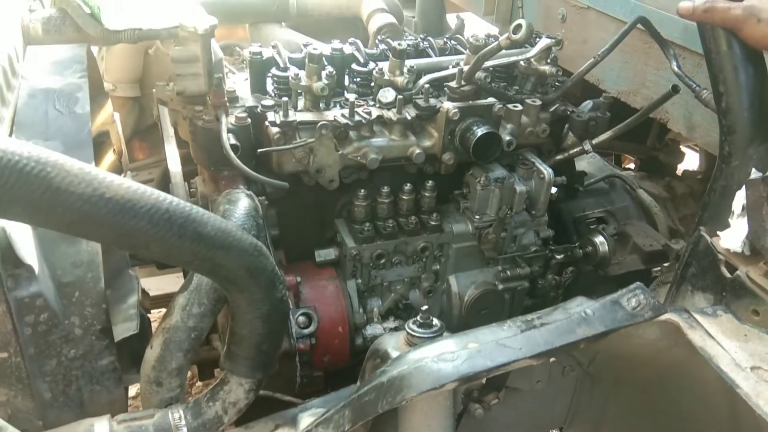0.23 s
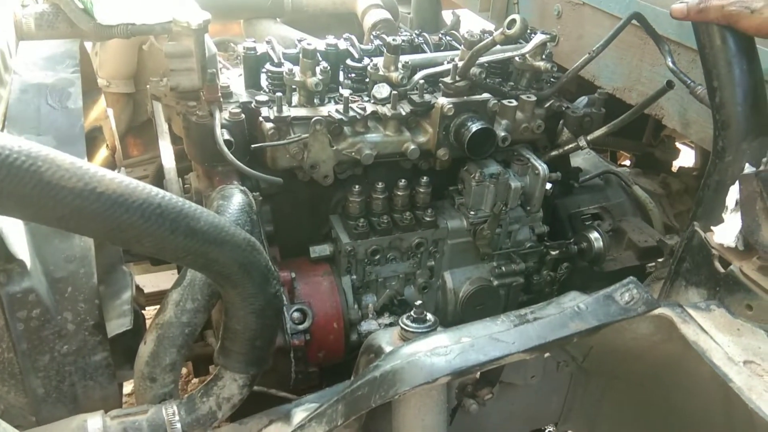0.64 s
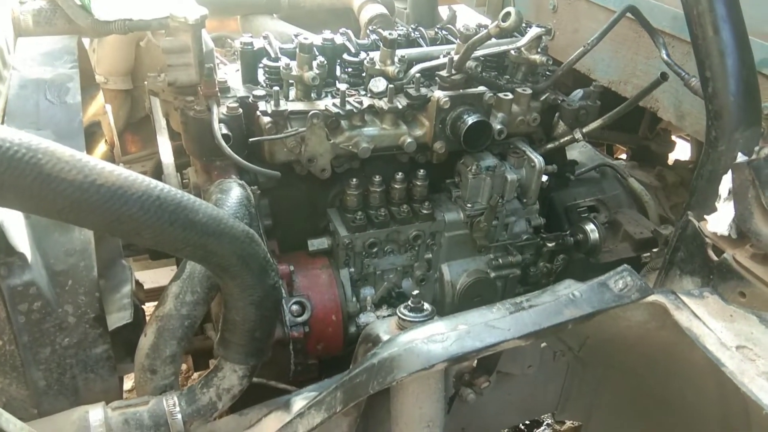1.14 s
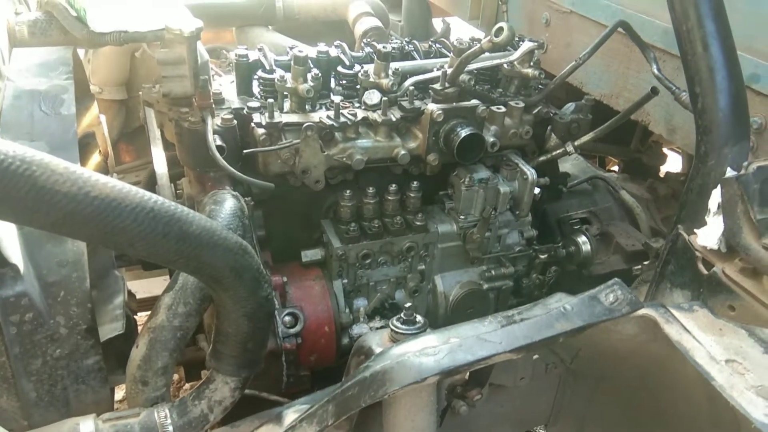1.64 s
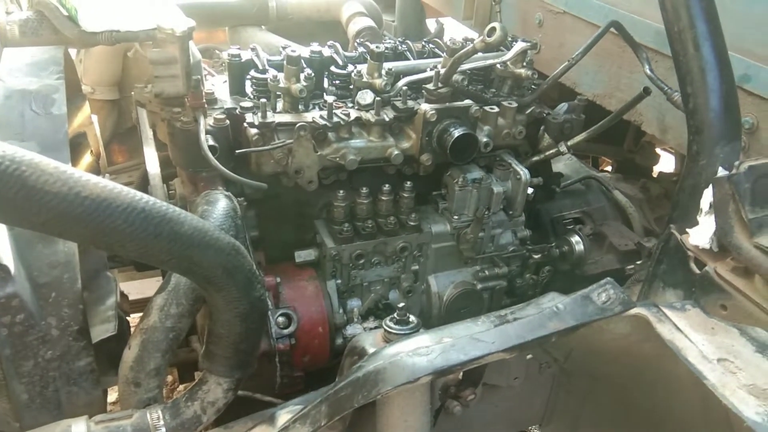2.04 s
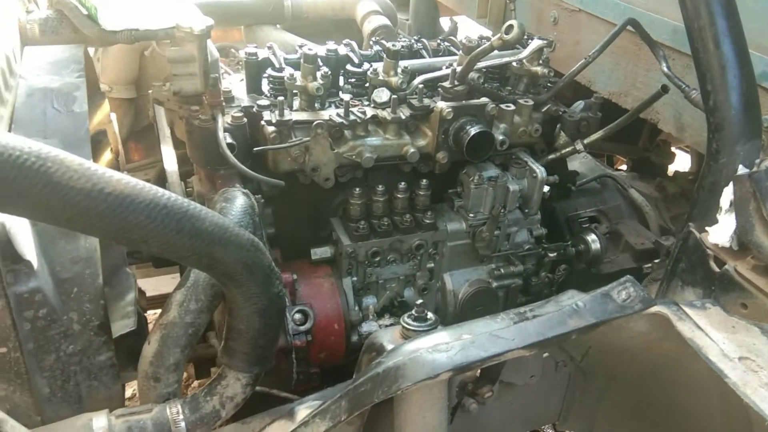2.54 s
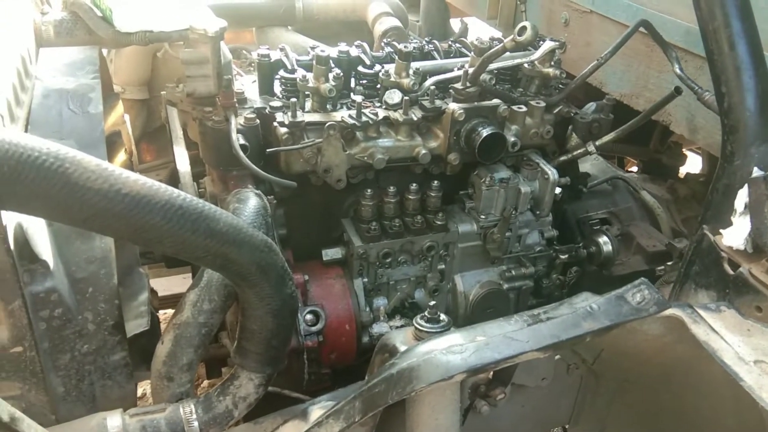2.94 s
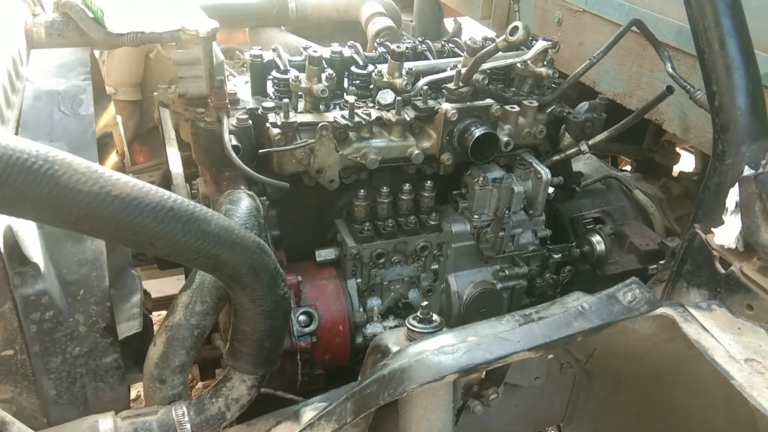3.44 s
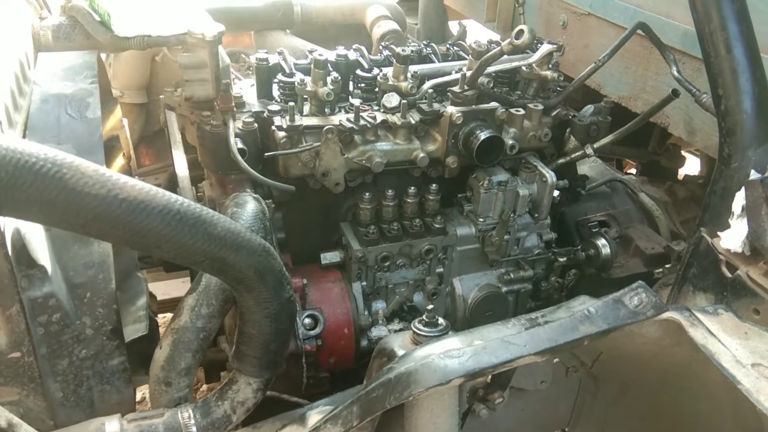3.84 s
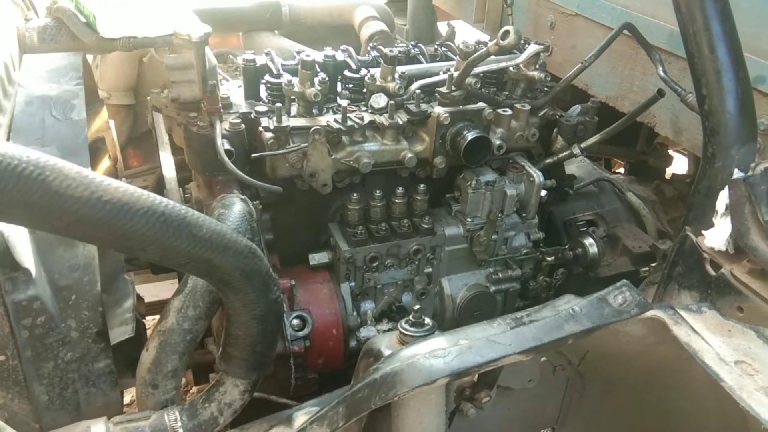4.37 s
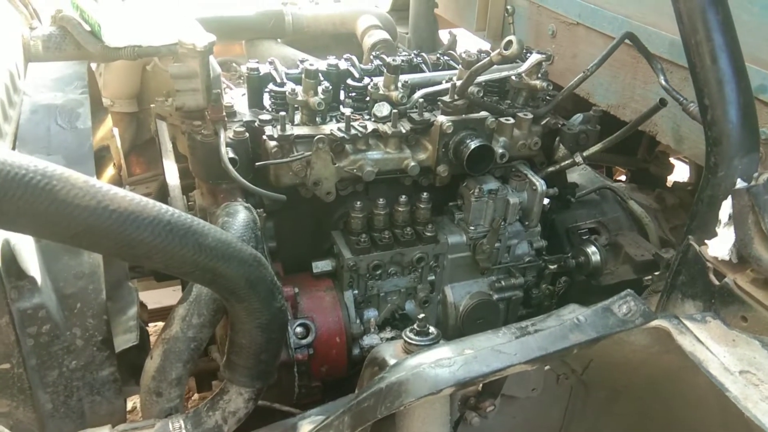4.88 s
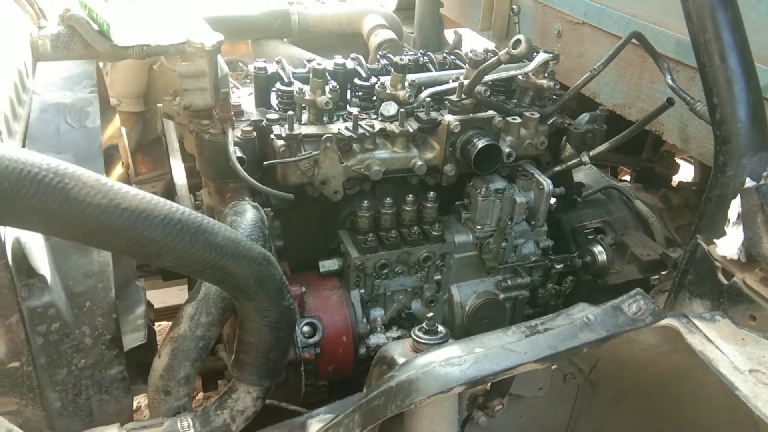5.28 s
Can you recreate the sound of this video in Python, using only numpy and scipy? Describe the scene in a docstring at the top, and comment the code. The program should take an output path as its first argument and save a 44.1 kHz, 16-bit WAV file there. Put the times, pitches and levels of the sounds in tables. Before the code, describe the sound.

Beside an exposed engine in a farmyard, quiet spanner-like ticks and a rustle sit close over distant traffic, hiss and cicadas. A dove coos softly, chicks peep faintly. Suddenly a tool hits metal, bouncing and ringing for under half a second, and the automatic gain ducks everything before recovering. Afterwards several distant roosters overlap, one note stretches on thinly, a boxy knock follows, and a heavier hollow thud closes the mono take.

```python
"""An open truck workshop in a farmyard, heard through one microphone with automatic gain.
Hiss, traffic rumble, engine notes and insects (shaped noise and tones) run from the start.
Ticks (noise puffs), a dove (fluttering tone), a rustle, chicks (whistles) and tinkles follow.
At 2.4 s a dropped spanner clangs on steel (ringing modes), rattles and lies down; the gain ducks and recovers.
From 3.3 s far roosters (overtone stacks) crow, one holding a long note; hollow thuds come at 3.6 and 5.4 s."""
import sys
import numpy as np
from scipy import signal
from scipy.fft import rfft, irfft, next_fast_len
from scipy.io import wavfile
from scipy.ndimage import uniform_filter1d, minimum_filter1d, map_coordinates

SR = 44100
rng = np.random.default_rng(int(sys.argv[2]) if len(sys.argv) > 2 else 0)


def log_audio(samples):
    """Write samples as a 16-bit WAV file to the path given in sys.argv[1]."""
    # one column per channel
    frames = np.atleast_2d(samples).T
    # limit to full scale, then quantise
    limited = np.clip(frames, -1, 1)
    pcm = np.round(limited * 32767).astype(np.int16)
    wavfile.write(sys.argv[1], SR, pcm)


N = 242982
T = np.arange(N) / SR


def amp(db):
    """Decibel law: the amplitude gain of a level."""
    return 10 ** (np.asarray(db) / 20)


def unit(x):
    """Power normalisation: x at rms 1."""
    return x / np.sqrt(np.mean(np.abs(x) ** 2) + 1e-20)


def filtered(x, response):
    """Linear filtering: the spectrum of x times a response of frequency."""
    m = next_fast_len(len(x) + 8192)
    spectrum = rfft(x, m) * response(np.fft.rfftfreq(m, 1 / SR))
    return irfft(spectrum, m)[:len(x)]


def modes(table):
    """Modal superposition: the response of (hz, width_hz, level_db) resonances with alternating signs."""
    def response(f):
        total = 0
        for k, (hz, width_hz, level_db) in enumerate(table):
            damping = 1j * f * width_hz
            total = total + (-1) ** k * amp(level_db) * damping / (hz * hz - f * f + damping)
        return total
    return response


def noise(points, size=N):
    """Spectral shaping: noise of rms 1 coloured by (hz, level_db) points on a log frequency axis."""
    f, db = np.transpose(points)
    return unit(filtered(rng.standard_normal(size), lambda hz: amp(np.interp(np.log(hz + 1), np.log(f), db))))


def wobble(rate):
    """Random modulation: a smooth curve through rate random knots a second."""
    return map_coordinates(rng.standard_normal(SR // 10), [T * rate], order=2, mode="wrap")


def smeared(phase, share, rate):
    """Line broadening: a tone of rms 1, a share of whose power is spread into narrow noise."""
    smear = unit(wobble(rate) + 1j * wobble(rate))
    return np.sqrt(2) * np.imag((np.sqrt(1 - share) + np.sqrt(share) * smear) * np.exp(1j * phase))


def add(track, s, x):
    """Superposition: mixes x into track from second s."""
    part = track[round(s * SR):][:len(x)]
    part += x[:len(part)]


def far(x, t60, wet_db):
    """Reverberation: the direct sound plus an exponentially decaying noise tail of echoes."""
    t = T[:SR // 2]
    tail = rng.standard_normal(len(t)) * amp(-60 * t / t60)
    return x + amp(wet_db) * signal.fftconvolve(x, tail / np.linalg.norm(tail))[:N]


def call(notes, attack, release, dip_db, sag_db, scoop_hz=0):
    """Voice contour: phase, gain and last column; notes rise out of a dip, glide, sag per second, fall back."""
    rows = []
    for s, length, first_hz, last_hz, db, control in notes:
        glide_hz, end_db = (last_hz - first_hz) / length, db - sag_db * length
        rows += [(s, first_hz - scoop_hz, db - dip_db, control),
                 (s + attack, first_hz + glide_hz * attack, db, control),
                 (s + length - release, last_hz - glide_hz * release, end_db, control),
                 (s + length, last_hz, end_db - dip_db, control)]
    s, hz, db, control = np.transpose(rows)
    phase = 2 * np.pi * np.cumsum(np.interp(T, s, hz)) / SR
    gain = amp(np.interp(T, s, db, left=-200, right=-200))
    return phase, gain, np.clip(np.interp(T, s, control), 0, 1)


# Spectrum of the far hiss: pitch_hz [Hz], level_db [relative dB per Hz]
HISS_SPECTRUM = [(100, -16.5), (220, 5), (400, 1), (800, -5), (1500, -9), (3000, -12.5), (4500, -13),
                 (5700, -17), (9500, -22), (12200, -28), (15500, -29)]
# Spectrum of the traffic: pitch_hz [Hz], level_db [relative dB per Hz]
RUMBLE_SPECTRUM = [(20, -26), (40, -18), (65, -3), (85, 0.5), (130, -1.5), (175, -5.5), (230, -19.5),
                   (400, -50)]
# Course of the traffic: time_s [s], level_db [dB, before a small random drift]
TRAFFIC_COURSE = [(0, -62), (.8, -58), (1.5, -58), (2.3, -58), (3, -55), (3.7, -58.5), (4.3, -53),
                  (4.9, -56.5), (5.5, -52.5)]


def yard():
    """Broadband noise: a nearly steady hiss over a lumpy low traffic rumble."""
    traffic_db = np.interp(T, *np.transpose(TRAFFIC_COURSE)) + 1.3 * wobble(2.8)
    hiss = amp(-66.0 + 0.69 * wobble(8.4)) * noise(HISS_SPECTRUM)
    return hiss + amp(traffic_db) * noise(RUMBLE_SPECTRUM)


# Far engines: start_s [s], length_s [s], first_hz [Hz], last_hz [Hz],
# level_db [dB at the end of the swell], unsteadiness [0-1]
ENGINE_NOTES = [(0, 2.1, 164.2, 182.6, -60.5, 0.62), (3.689, 1.49, 132, 145, -55, 0.44)]


def drones():
    """Gliding quasi-periodic tones: engine notes that swell out of the rumble."""
    out = np.zeros(N)
    for note in ENGINE_NOTES:
        phase, gain, unsteady = call([note], attack=0.89, release=0.23, dip_db=16, sag_db=6)
        out += gain * amp(1.55 * wobble(4.12)) * smeared(phase, unsteady, rate=10)
    return out


# Cicada chorus bands: pitch_hz [Hz], width_hz [Hz], level_db [relative dB of one of two filter passes]
CICADA_BANDS = [(6708, 400, -5), (7887, 500, 0)]


def insects():
    """Resonance and amplitude modulation: a cicada chorus, a katydid's falling clicks, a cricket's chirps."""
    band = modes(CICADA_BANDS)
    chorus = unit(filtered(rng.standard_normal(N), lambda f: band(f) ** 2))
    chorus = chorus * amp(0.79 * wobble(60) + 0.34 * wobble(1.4))

    stroke = (108.8 * T + 0.042 * wobble(3)) % 1  # position within each stroke of the buzz
    sweep = 2 * np.pi * np.cumsum(11350 - 1400 * stroke + 100 * wobble(450)) / SR
    katydid = np.exp(-((stroke - .3) / 0.19) ** 2) * amp(2.5 * wobble(90)) * np.sin(sweep)
    others = modes([(10750, 900, 0)])  # more katydids far off blur into a hiss
    katydid = katydid + amp(-8.5) * unit(filtered(rng.standard_normal(N), lambda f: others(f) ** 2))

    chirp = np.exp(-(((14.03 * T - .57) % 1 - .5) / .17) ** 2) * amp(2.5 * wobble(4))
    cricket = chirp * np.sin(2 * np.pi * 8490 * T + 1.5 * wobble(40))
    return amp(-61.5) * chorus + amp(-73.5) * katydid + amp(-71) * cricket


# Noise of ticks and drags: pitch_hz [Hz], level_db [relative dB per Hz]
SCUFF_SPECTRUM = [(100, -0.5), (300, 7.5), (2000, -2), (5000, -13), (9000, -23), (16000, -51.5)]
# Dull ticks: start_s [s], level_db [nominal dB], pitch_hz [Hz]
DULL_TICKS = [(0.138, -52, 920), (.293, -59.5, 2100), (0.619, -61.5, 1650), (.706, -55.5, 1900),
              (1.352, -56, 300), (1.51, -59, 1130), (1.558, -58, 1600), (1.596, -59.5, 1120),
              (1.66, -58.5, 1050), (1.681, -65, 1010), (2.205, -64.5, 3000), (2.405, -47.5, 880),
              (2.54, -39, 635), (2.661, -47.5, 1400), (2.694, -46.5, 2240), (2.721, -50, 1478),
              (2.758, -51, 1530), (3.03, -62.5, 2490), (3.415, -48.5, 1210), (3.579, -41.5, 1200)]


def ticks():
    """Damped impact: a noise puff in one broad resonance, with a bright crack at first contact."""
    out, t = np.zeros(N), T[:SR // 2]
    body_t60_s, crack_t60_s = 0.12, .012
    for s, db, hz in DULL_TICKS:
        body = modes([(hz, 0.52 * hz, 0)])
        puff = unit(filtered(noise(SCUFF_SPECTRUM, len(t)), lambda f: body(f) ** 2 + 0.082))
        puff = puff * amp(db - 5.5 - 60 * t / body_t60_s) * (1 + 1.4 * np.exp(-t / .004))
        crack = noise([(500, -0.5), (5000, -3.5), (16000, -20.5)], len(t))
        add(out, s, puff + amp(db - 5 - 60 * t / crack_t60_s) * crack)
    return out


# Coos: start_s [s], length_s [s], top_hz [Hz], last_hz [Hz],
# level_db [dB at the end of the swell], flutter [0-1]
COOS = [(0.482, 0.084, 489, 475, -53.5, 0.5), (1.157, 0.24, 518.4, 476, -59.5, 0.13),
        (1.464, .62, 522, 503, -57, 0.86), (2.069, 0.67, 490.5, 432, -55.5, 0.03)]


def dove():
    """Amplitude modulation: a near-pure tone fluttered near 48 Hz, alternate beats stronger; rolls swell slowly."""
    beat = np.pi * np.cumsum(48 + 6 * wobble(11)) / SR
    flutter = (.15 + np.sin(beat) ** 4) * (1 + 0.15 * np.sin(beat))
    flutter = unit(flutter * amp(2.5 * wobble(40)))
    out = np.zeros(N)
    for coo in COOS:
        length, roll = coo[1], coo[5]
        # a coo slides up while it swells, a rolled one further
        phase, gain, share = call([coo], attack=0.03 + 0.64 * length * roll, release=0.041, dip_db=13,
                                  sag_db=12, scoop_hz=18 + 79.8 * roll)
        out += gain * (1 - share + share * flutter) * smeared(phase, 0.2 * share, rate=140)
    return far(out, t60=0.21, wet_db=-8.0)


# Resonances of a hollow box: pitch_hz [Hz], width_hz [Hz], level_db [relative dB]
BOX_MODES = [(388, 50, 0.5), (453, 127, -5.5), (670, 340, -10.5), (868, 140, -2), (1120, 310, -11),
             (1646, 43, -2.5), (4080, 380, -24)]
# Thuds and one rustle (the first row, its box far below its crunch):
# start_s [s], box_db [dB gain], crunch_db [dB gain], drag_s [s], t60_s [s]
DRAGS = [(0.576, -77, -65.5, 0.081, 0.32), (3.57, -54.5, -59, 0.089, 0.28),
         (3.677, -34.5, -54, 0.021, 0.15), (5.324, -48.5, -62.5, 0.0704, 0.12),
         (5.39, -23.5, -44, 0.029, 0.19)]


def rustle_and_thuds():
    """Forced resonance: a crunchy drag, hardest at first contact, rustles or drives a hollow box into a thud."""
    out, t = np.zeros(N), T[:SR // 2]
    for s, box_db, crunch_db, length, t60 in DRAGS:
        drag = amp(-60 * np.maximum(t - length, 0) / t60) * noise(SCUFF_SPECTRUM, len(t))
        drag *= (1 + 2.2 * np.exp(-t / 0.006)) * (1 - np.exp(-t / .0015))
        add(out, s, amp(box_db) * filtered(drag, modes(BOX_MODES)) + amp(crunch_db) * drag)
    return out


# Chicks: start_s [s], length_s [s], middle_hz [Hz], fall_hz [Hz from start to end],
# level_db [dB before huskiness and echo]
CHICK_PEEPS = [(0.584, 0.039, 4380, 203, -57.5), (1.683, 0.08, 4230, 1366, -56.5),
               (2.419, 0.044, 4420, -170, -51), (3.249, 0.056, 4140, 2001.5, -56),
               (4.211, 0.043, 4380, -360, -58.5), (4.703, 0.022, 7280, 2895, -44.5),
               (4.937, 0.022, 4550, 0.5, -66), (4.99, 0.047, 4340, -320, -57),
               (5.045, 0.032, 4600, 97, -60.5), (5.124, 0.054, 4350, 437, -71)]


def chicks():
    """Frequency modulation: quick arched whistles, husky by random gain and heard mostly as echoes."""
    out = np.zeros(N)
    arch_hz = 690  # the middle stands this far above the line from start to end
    for s, length, middle_hz, fall_hz, db in CHICK_PEEPS:
        u = T[:round(length * SR)] / length
        hz = middle_hz - fall_hz * (u - .5) - arch_hz * (2 * u - 1) ** 2
        swell = np.sin(np.pi * u ** 0.53) ** 2
        add(out, s, amp(db) * swell * np.sin(2 * np.pi * np.cumsum(hz) / SR))
    husky = out * (.3 + wobble(1100))
    return far(husky, t60=0.33, wet_db=1.5)


# Small loose parts: start_s [s], pitch_hz [Hz], level_db [dB before the onset and echo], t60_s [s]
LOOSE_PARTS = [(.602, 6400, -50, .05), (.638, 6380, -38, 0.035), (.639, 3490, -47.5, 0.027),
               (.64, 10300, -64, .1), (1.512, 8850, -65, 0.37), (1.52, 3310, -68, 0.32),
               (1.53, 11700, -65, 0.5), (1.556, 5798, -68, 0.64), (1.625, 5820, -65, 0.96),
               (1.81, 9300, -67, 0.16), (4.51, 4960, -73.5, 0.079), (4.55, 4260, -74, .25),
               (5.345, 4520, -62, 0.23)]


def tinkles():
    """Free vibration: each small loose part rings in a single decaying mode."""
    out, t = np.zeros(N), T[:SR // 2]
    for s, hz, db, t60 in LOOSE_PARTS:
        onset = 1 - np.exp(-t / 0.0002)
        add(out, s, amp(db - 60 * t / t60) * np.sin(2 * np.pi * hz * t) * onset)
    return out


def ring(table, s, t, spent, hardness_db, rocking_db):
    """Modal decay: modes keep phase from blow to blow, decay over spent seconds, brighten with hardness."""
    out = 0
    for hz, db, t60 in table:
        start_db = db + hardness_db * np.log2(hz / 8000) + rng.normal(0, 4)
        # a turning tool beams each mode past the listener
        rock_db = rocking_db * np.sin(2 * np.pi * (rng.uniform(4, 10) * t + rng.random()))
        out = out + amp(start_db + rock_db - 60 * spent / t60) * np.sin(2 * np.pi * hz * (s + t))
    return out


# Modes of the struck plate: pitch_hz [Hz], level_db [relative dB before hardness and scatter], t60_s [s]
PLATE_MODES = [(2327, -21, .07), (2941, -23, .06), (3833, -17, .1), (4447, -24, .06), (5669, -15, .25),
               (7458, -20, .07), (8084, 0, .13), (8697, -13, .22), (12333, -21, .13), (13020, -36, .12),
               (14620, -35, .15), (14980, -36, .2), (15150, -38, .2)]
# Modes of the spanner: pitch_hz [Hz], level_db [relative dB before hardness and scatter], t60_s [s]
SPANNER_MODES = [(1045, -36, .6), (1868, -28, .12), (2255, -25, 2), (2750, -25, 2), (3709, -30, .3),
                 (5351, -3, .6), (5357, -5, .5), (6135, -4, .4), (6150, -9, .8), (9243, -9, .2),
                 (9265, -4, .6), (9286, -8, .25), (10752, -7, .5), (10782, -9, .2), (11410, -15, .4),
                 (11510, -24, .2), (13790, -24, .3)]
# Blows: start_s [s], plate_db [dB gain], spanner_db [dB gain], clatter_db [dB gain], chatter_s [s]
SPANNER_BLOWS = [(2.405, -74.5, -65, -45, 0.0012), (2.4561, -10, -40, -15, 0.027),
                 (2.473, -15.5, -62, -26, 0.022), (2.484, -22.5, -33.5, -22.5, 0.0042),
                 (2.535, -10.5, -24.5, -30, 0.00067), (2.574, -71, -62, -40, 0.0021),
                 (2.599, -68.5, -44, -53, 0.048), (2.691, -46, -48, -70, 0.004),
                 (3.415, -71, -56, -77, 0.0041)]
# Noise of a blow: pitch_hz [Hz], level_db [relative dB per Hz]
CLATTER_SPECTRUM = [(25, -27.5), (50, -8), (90, 7.5), (200, -4.5), (900, -8), (2700, -5), (4500, -9.5),
                    (6500, -14), (8200, -4), (10500, -21), (16000, -19.5)]


def clang():
    """Impact excitation: chatter sustains plate and noise; the spanner rings until it lies down."""
    out, t = np.zeros(N), T[:SR // 2]
    lies_down_s, lying_ring_s = 2.782, 0.088  # once lying, it rings freely only this long
    for s, plate_db, spanner_db, clatter_db, chatter in SPANNER_BLOWS:
        free = max(lies_down_s - s, lying_ring_s)
        hardness_db = 2.5 + 0.071 * (clatter_db + 33.5)  # treble tilt in dB per octave
        spent = np.maximum(t - chatter, 0)
        rise = 1 - np.exp(-t / (.001 + 0.069 * chatter))
        plate = amp(plate_db) * ring(PLATE_MODES, s, t, spent, hardness_db, rocking_db=-0.94)
        spanner = ring(SPANNER_MODES, s, t, t, hardness_db, rocking_db=7.5) * (1 - np.exp(-t / 0.016))
        spanner *= amp(spanner_db - 60 * np.maximum(t - free, 0) / 0.12)
        fade = amp(-250 * np.minimum(t, chatter) - 60 * spent / .02) + amp(-12 - 60 * t / .2)
        clatter = amp(clatter_db) * fade * noise(CLATTER_SPECTRUM, len(t))
        add(out, s, rise * (plate + spanner + clatter))
    return out


# Roosters, each a pair: overtones level_db [relative dB], then syllables: start_s [s], length_s [s],
# first_hz [Hz], last_hz [Hz], level_db [dB before overtone levels], hoarseness [0-1]
ROOSTER_CROWS = [([-8.5, -2, -21.5, -6.5, -20], [(3.36, 0.2, 769.5, 765, -62.5, 0.62),
                 (3.68, 0.24, 777, 781, -65, 0.41), (3.96, .21, 797, 789, -59, 0.56),
                 (4.2, 0.14, 762, 757, -61, 0.28)]), ([1.5, 7, -11, -12.5],
                 [(3.61, 0.15, 935, 940, -66.5, .55), (3.86, 0.134, 941, 952, -68, 0.3),
                 (3.99, 0.18, 929, 945, -69, 0.35)]), ([-1.5, -16, -0.5, -25],
                 [(4.11, 0.11, 728, 719, -58.5, 0.07), (4.25, 0.073, 728, 730, -62.5, 0.2)]),
                 ([-19.5, 0, -3, -5, -11.5, -7], [(3.32, 0.19, 634, 608, -64.5, 0.62),
                 (3.78, 0.23, 575, 561, -63, 0.52), (3.99, 0.27, 598, 580, -66, 0.54)])]


def roosters():
    """Harmonic synthesis: louder is brighter, hoarseness smears overtones and moving air makes each waver."""
    out = np.zeros(N)
    for overtones_db, syllables in ROOSTER_CROWS:
        phase, gain, hoarse = call(syllables, attack=.045, release=0.043, dip_db=5.5, sag_db=9)
        for k, db in enumerate(overtones_db):
            brightness = (gain / amp(-56.5)) ** (0.086 * k)
            waver = amp(db + 3.4 * wobble(16))
            out += gain * brightness * waver * smeared((k + 1) * phase, hoarse, rate=250)
    return far(out, t60=.25, wet_db=-13)


# First rooster's long last note, harmonics counted from the fundamental: time_s [s],
# second_hz [Hz], second_db [dB], fourth_db [dB]
LONG_NOTE = [(4.35, 1517, -67, -60.5), (4.372, 1512, -58.5, -67.5), (4.536, 1515, -54, -64.5),
             (4.674, 1515, -61.5, -76), (4.702, 1512, -61, -88), (4.748, 1517, -57, -71),
             (4.8, 1518, -63.5, -63), (4.86, 1517, -69, -70), (5.02, 1523, -54.5, -67.5),
             (5.064, 1514, -70.5, -73.5), (5.124, 1516, -58.5, -74), (5.178, 1511, -77, -68),
             (5.212, 1510, -62.5, -72), (5.292, 1520, -63.5, -79), (5.356, 1507, -51.5, -82),
             (5.38, 1507, -56, -74)]


def held_note():
    """Independent fading: harmonics of a clean long note come and go on their own over the distance."""
    s, second_hz, second_db, fourth_db = np.transpose(LONG_NOTE)
    phase = np.pi * np.cumsum(np.interp(T, s, second_hz)) / SR  # the fundamental, at half that pitch
    levels_db = [-77 + 6 * wobble(12), np.interp(T, s, second_db),
                 -85 + 4 * wobble(14), np.interp(T, s, fourth_db)]
    onset = np.clip((T - s[0]) / .03 + 1, 0, 1)
    note = sum(amp(db) * smeared((k + 1) * phase, .03, rate=100) for k, db in enumerate(levels_db))
    return far(onset * note, t60=.2, wet_db=-15)


def scene():
    """Superposition: all sources sum at one microphone that feeds both channels."""
    mono = yard() + drones() + insects() + dove() + roosters() + held_note() + chicks() + clang()
    mono += far(ticks() + tinkles() + rustle_and_thuds(), t60=0.05, wet_db=-8)
    return np.array([mono, mono])


def held(level_db, hold):
    """Peak holding: the highest level of the last hold seconds."""
    size = int(hold * SR) | 1
    return -minimum_filter1d(-level_db, size, origin=size // 2, mode="nearest")


def record(dry):
    """Automatic gain control: loud sound pulls a gliding gain down through a short and a longer hold."""
    level_db = 10 * np.log10(np.abs(uniform_filter1d(dry[0] ** 2, size=882)) + 1e-12)
    over_db = np.maximum(level_db + 24.5, 0)
    cut_db = 0.32 * held(over_db, 0.58) + 0.83 * held(over_db, 0.92)
    glide = np.exp(-1 / (.15 * SR))  # time constant 0.15 s
    gain = amp(-signal.lfilter([1 - glide], [1, -glide], cut_db))
    out = filtered(dry[0] * gain, lambda hz: 1 / (1 + (hz / 15600) ** 200))  # steep top limit
    return np.array([out, out])


dry = scene()
out = record(dry)
log_audio(out)
```